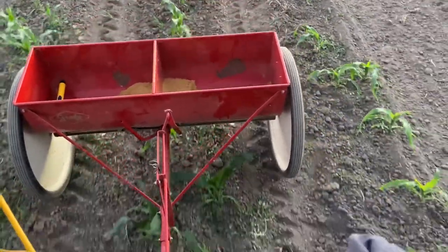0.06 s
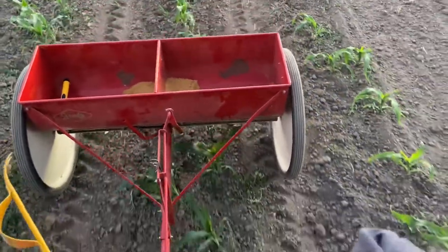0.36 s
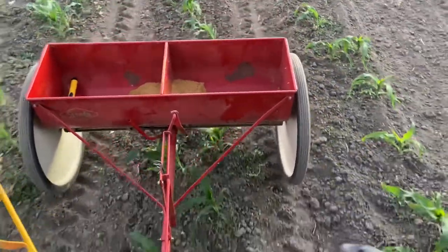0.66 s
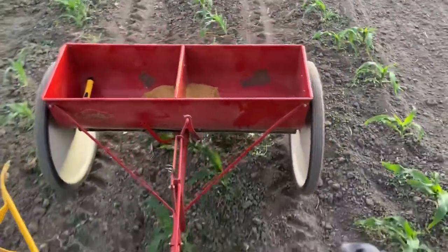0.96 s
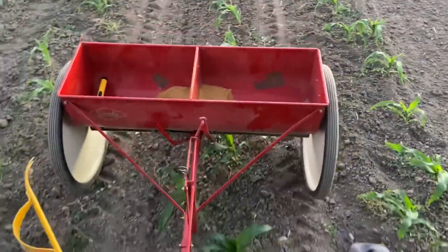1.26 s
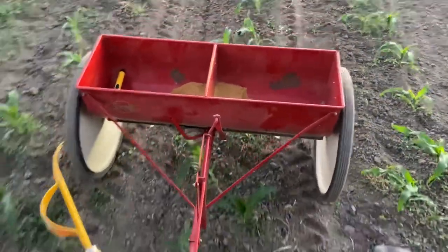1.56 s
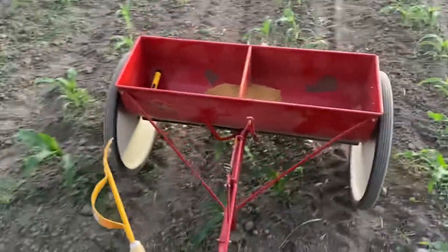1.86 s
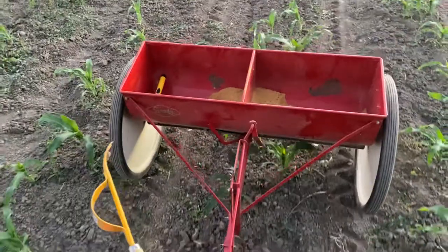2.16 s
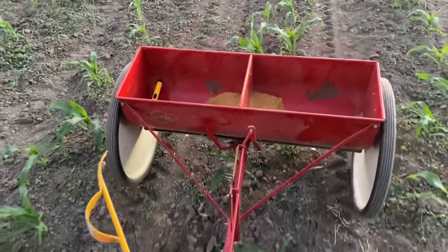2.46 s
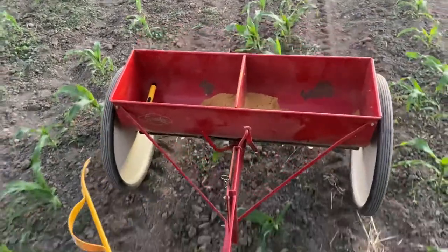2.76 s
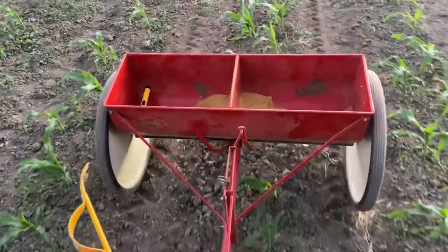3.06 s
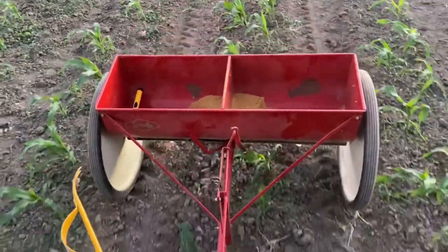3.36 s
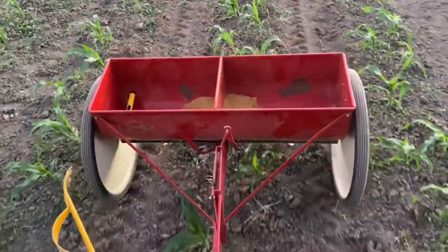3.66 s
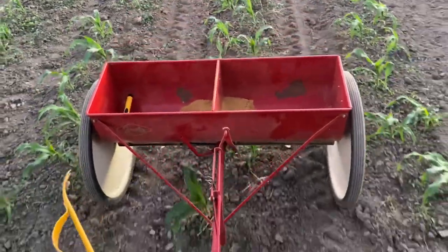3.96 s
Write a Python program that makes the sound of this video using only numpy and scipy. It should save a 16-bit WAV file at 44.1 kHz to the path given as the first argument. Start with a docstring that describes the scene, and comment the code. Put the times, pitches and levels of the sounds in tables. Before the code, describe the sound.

Close from the seat, a tractor drones evenly across a field, its deep pulsing exhaust mixed with metallic chatter and faint gear whine. It grows slightly louder as a small towed seed drill rattles and its hitch clanks now and then.

```python
"""Tractor and seed drill, from the driver's seat.

Out on a field at steady revs, two microphones close behind the engine. Each firing sends a puff down
the exhaust that sinks in pitch, booms and rings the pipe. The chassis shudders, the engine clatters in
step with the shaft, gears whine, fan and belts hiss. Behind the seat a small towed seed drill rattles
and clanks on its hitch."""
import sys
import numpy as np
from scipy import signal
from scipy.fft import rfft, irfft
from scipy.io import wavfile
from scipy.ndimage import uniform_filter1d, map_coordinates

SR = 44100
rng = np.random.default_rng(int(sys.argv[2]) if len(sys.argv) > 2 else 0)


def file_out(sig):
    """Save sig as 16-bit WAV at sys.argv[1]."""
    # one column per channel
    cols = np.atleast_2d(sig).T
    # limit, then scale
    lim = np.clip(cols, -1, 1)
    pcm = np.round(lim * 32767).astype(np.int16)
    wavfile.write(sys.argv[1], SR, pcm)


N = 176400
TIME, FREQS = np.arange(N) / SR, np.fft.rfftfreq(N, 1 / SR)


def undb(db):
    """Decibels to gain."""
    return 10 ** (np.asarray(db) / 20)


def unit(x):
    """Scale to rms 1."""
    return x / np.sqrt(np.mean(x ** 2))


def curve(table, column=1):
    """One column of a time table at every sample."""
    rows = np.array(table)
    return np.interp(TIME, rows[:, 0], rows[:, column])


def across(table, column=1):
    """One column of a frequency table at every bin."""
    rows = np.array(table)
    return np.interp(np.log(FREQS + 1), np.log(rows[:, 0]), rows[:, column])


def colour(x, table):
    """Filter by a spectrum that falls away steeply past its ends; the result has rms 1."""
    hz = FREQS + 1
    skirts = np.minimum(hz / table[0][0], 1) ** 4 * np.minimum(table[-1][0] / hz, 1) ** 4
    return unit(irfft(rfft(x) * undb(across(table)) * skirts, N))


def wander(per_s):
    """Smooth random wander with rms 1."""
    hold = int(SR / per_s)
    steps = np.repeat(rng.standard_normal(N // hold + 1), hold)
    return unit(uniform_filter1d(uniform_filter1d(steps, hold), hold)[:N])


def ride_band(x, db, hz, kind="band", order=2):
    """Raise or lower one band along a level curve."""
    band = signal.sosfiltfilt(signal.butter(order, hz, kind, fs=SR, output="sos"), x)
    return x + band * (undb(db) - 1)


# How the machinery reaches the two microphones at the seat
# (frequency [Hz], left minus right [dB], right lead [rad], likeness [0-1])
MIC_PATHS = [(307, 1.5, 0.46, 0.92), (477, -8, 1.94, 0.83), (637, -10, -1.73, 0.25),
             (732, -6.5, -0.84, 0.37), (1080, -3, -0.77, 1), (1810, -3.5, -0.12, 0.64),
             (2600, -1, 0.68, 0.07), (3460, 0.5, -1.36, 0.68), (5000, 0.5, -0.17, 0.23),
             (6100, 2.5, 1.8, 0.45), (7400, -4, -0.22, 1), (15100, 1.5, 0.57, 0.86)]

def at_microphones(main, stray):
    """Spread a sound over the pair; the stray part differs between them and the left treble lags."""
    pan_db, lead, likeness = (across(MIC_PATHS, column) for column in (1, 2, 3))
    treble_hz, treble_lag_s = 6830, .000226
    lead = lead + 2 * np.pi * treble_lag_s * np.maximum(FREQS - treble_hz, 0)
    mid = rfft(main) * np.sqrt((1 + likeness) / 2)
    side = rfft(stray) * np.sqrt((1 - likeness) / 2)
    left = (mid + side) * undb(pan_db / 2)
    right = (mid - side) * undb(-pan_db / 2) * np.exp(1j * lead)
    equal_power = np.sqrt(2 / (undb(pan_db) + undb(-pan_db)))
    return irfft(equal_power * np.array([left, right]), N)


# Ahead of the seat: a deep boom under each puff near twice the firing rate, then the pipe's higher rings
# (frequency [Hz], decay [s], delay after the puff [s], level against the puff [dB])
BOOM_AND_RINGS = [(45, 0.04, 0.0026, -26), (175.2, 0.0088, 0.00755, -6), (239, 0.032, 0.0008, -31.5),
                  (302, 0.015, 0.01433, -21), (323, 0.027, 0.00994, -32.5)]
PUFF_START_HZ, PUFF_SINK_S, PUFF_PEAK_S, PUFF_SHAPE = 193.2, 0.03515, 0.014, 2.2
PUFF_DELAY_S, OCTAVE_SHARE, OCTAVE_FADE_S = 0.0073, 0.36, 0.016
PUFF_SCATTER_DB, PUFF_JITTER_S, PUFF_DETUNE = 0.41, .00007, .003
TONE_SCATTER_DB, TONE_DETUNE = 1.5, 0.011

def exhaust(firings):
    """A puff per firing: it swells, sinks in pitch and dies over a deep boom, and the pipe rings."""
    starts = np.interp(np.arange(int(firings[-1]) + 1), firings, TIME) + PUFF_DELAY_S
    out = np.zeros(N)
    for start in starts:
        size, late, pitch, strength, tune = rng.standard_normal(5)
        span = slice(int(start * SR), int(start * SR) + SR // 10)
        age = np.maximum(TIME[span] - start - PUFF_JITTER_S * late, 0)
        start_hz = PUFF_START_HZ * (1 + PUFF_DETUNE * pitch)
        phase = 2 * np.pi * start_hz * PUFF_SINK_S * (1 - np.exp(-age / PUFF_SINK_S))
        swell = (age / PUFF_PEAK_S * np.exp(1 - age / PUFF_PEAK_S)) ** PUFF_SHAPE
        octave = OCTAVE_SHARE * np.exp(-age / OCTAVE_FADE_S) * np.cos(2 * phase)
        puff = -swell * (np.sin(phase) + octave)
        for hz, decay, delay, db in BOOM_AND_RINGS:
            tone_age = np.maximum(age - delay, 0)
            tone = np.sin(2 * np.pi * hz * (1 + TONE_DETUNE * tune) * tone_age)
            puff += undb(db + TONE_SCATTER_DB * strength) * tone * np.exp(-tone_age / decay)
        out[span] += undb(PUFF_SCATTER_DB * size) * puff
    return unit(out)


# Shudder of the chassis, under the seat (frequency [Hz], relative density [dB])
CHASSIS_SPECTRUM = [(48, -7), (60, -9), (100, -10), (200, -8), (250, 1.5), (320, -4), (480, -13)]

def chassis(firings, depth=0.29):
    """A low rumble that pulses once per firing."""
    pulse = 1 + depth * np.cos(2 * np.pi * (firings - .4))
    return colour(pulse * rng.standard_normal(N), CHASSIS_SPECTRUM)


# Exhaust and chassis between the microphones (time [s], left minus right [dB], left lag [s])
EXHAUST_IMAGE = [(0, 2, 0.0011), (.55, 0, 0.0006), (1.05, 0.5, 0.00052), (1.94, 0.5, 0.00046),
                 (2.02, 3.5, 0.00077), (4, 2.5, 0.0013)]

def place_exhaust(sound):
    """Level and arrival differ across the pair; the image narrows, then widens again."""
    pan_db, lag = curve(EXHAUST_IMAGE, 1), curve(EXHAUST_IMAGE, 2)
    return np.array([undb(side * pan_db / 2) * np.interp(TIME - side * lag / 2, TIME, sound)
                     for side in (1, -1)])


# Engine block and panels, close ahead (frequency [Hz], relative density [dB])
BLOCK_SPECTRUM = [(210, -4), (350, -2.5), (382, -10), (413, -4), (447, -4.5), (478, -5), (604, -5),
                  (679, -0.1), (919, -9), (994, -8.5), (1060, -8), (1270, -7.5), (1380, -9), (1700, -8.5),
                  (1930, -17.5), (2280, -17), (2850, -16.5), (3330, -25.5), (3600, -24.5), (4680, -33),
                  (7920, -120)]
# Tone of the clatter at the seat (time [s], low band gain [dB], high band gain [dB])
CLATTER_TONE = [(0, -1.5, -1), (.5, -1.5, -.3), (.67, -2, 1.5), (.8, -1.5, 0.5), (1.15, 0.5, 0),
                (1.45, -2, -2.5), (1.66, 2.5, 0), (1.9, 2.5, -2.5), (2.12, 2.5, -2), (2.25, 5, 1.5),
                (2.62, 2.5, -0.5), (2.8, 1.5, -0.5), (3.03, 2, 0), (3.22, -0.5, -1), (3.38, -0.5, 0),
                (3.6, -2, -1.5), (4, -1, 0)]
REPEAT_SHARE, KNOCK_DEPTH, LUMP_DB = 0.36, 0.045, 0.8

def clatter(firings):
    """Valve gear and cogs repeat every two firings, amid loose chatter, whine, ringing and chinks."""
    pattern = rng.standard_normal(4096)
    position = firings / 2 % 1 * len(pattern)
    repeating = unit(map_coordinates(pattern, [position], mode="grid-wrap"))
    knock = 1 + KNOCK_DEPTH * np.cos(2 * np.pi * 2 * (firings - .4))  # twice per firing
    knock *= undb(LUMP_DB * wander(per_s=110))
    chatter = np.sqrt(REPEAT_SHARE) * repeating + np.sqrt(1 - REPEAT_SHARE) * rng.standard_normal(N)
    main = colour(knock * chatter, BLOCK_SPECTRUM) + gear_whine(firings) + ringing_metal() + chinks()
    stray = colour(knock * rng.standard_normal(N), BLOCK_SPECTRUM)
    sound = at_microphones(main, stray)
    sound = ride_band(sound, curve(CLATTER_TONE, 1), hz=(350, 640))
    return ride_band(sound, curve(CLATTER_TONE, 2), hz=(1600, 4500))


# Gear and shaft tones, close by (order [x firing rate], level against the block [dB])
GEAR_ORDERS = [(19, -17), (31, -16), (32, -11.5), (34, -19), (35, -22), (39, -18.5), (51, -18.5),
               (57.8, -21.5), (69.3, -19), (79, -19)]

def gear_whine(firings, waver_db=3, waver_rad=0.61):
    """Tones locked to the shaft, each wavering in level and phase."""
    out = np.zeros(N)
    for order, db in GEAR_ORDERS:
        amplitude = np.sqrt(2) * undb(db + waver_db * wander(per_s=12))
        out += amplitude * np.sin(2 * np.pi * order * firings + waver_rad * wander(per_s=30))
    return out


# Ringing metal parts around the seat (frequency [Hz], level against the block [dB])
METAL_MODES = [(682, -12.5), (1090, -17), (1230, -21), (1340, -18), (1570, -22), (1700, -18), (2530, -25.5),
               (2745, -26), (2905, -24.5)]

def ringing_metal(width_hz=19, flicker_db=2.5):
    """Narrow resonances of metal parts, shaken unevenly by the vibration."""
    out = np.zeros(N)
    for hz, db in METAL_MODES:
        shake = rng.standard_normal(N) * undb(flicker_db * wander(per_s=12))
        resonance = signal.iirpeak(hz, hz / width_hz, fs=SR)
        out += undb(db) * unit(signal.lfilter(*resonance, shake))
    return out


CHINKS_PER_S, CHINK_DECAY_S, CHINK_RELATIVE_DB, CHINK_SPREAD_DB = 260, 0.019, -8, 4
CHINK_LOW_HZ, CHINK_HIGH_HZ, CHINK_KNEE_HZ, CHINK_FALL_DB_PER_OCTAVE = 1050, 4494, 1400, 8.5

def chinks():
    """Many small loose parts are jolted and ring briefly, each at its own pitch, high ones fainter."""
    age = np.arange(SR // 10) / SR
    out = np.zeros(N + len(age))
    for when, pitch, size in rng.random((int(CHINKS_PER_S * N / SR), 3)):
        hz = CHINK_LOW_HZ * (CHINK_HIGH_HZ / CHINK_LOW_HZ) ** pitch
        db = CHINK_SPREAD_DB * size - CHINK_FALL_DB_PER_OCTAVE * max(np.log2(hz / CHINK_KNEE_HZ), 0)
        at = int(when * N)
        out[at:at + len(age)] += undb(db) * np.sin(2 * np.pi * hz * age) * np.exp(-age / CHINK_DECAY_S)
    return undb(CHINK_RELATIVE_DB) * unit(out[:N])


# Fan and belts, up front (frequency [Hz], relative density [dB])
FAN_SPECTRUM = [(2200, 3), (3200, -1.5), (4000, 1.6), (5200, -1), (6000, -3.5), (7500, -3), (9000, -4),
                (11200, -3), (12500, -2), (14500, -11.5), (16000, -19.5)]
# Highest treble of the hiss at the seat (time [s], gain [dB])
FAN_TREBLE = [(0, 0.82), (.6, -0.48), (1.2, -1.2), (1.85, -1.8), (2.1, 1), (2.7, 0.67), (3.3, .5), (4, 1)]

def fan_hiss(grain_db=1, flicker_db=1.09):
    """Fine grainy hiss of the fan and belts; its top brightens halfway through."""
    grain = undb(grain_db * wander(per_s=500) + flicker_db * wander(per_s=24.75))
    main, stray = (colour(grain * rng.standard_normal(N), FAN_SPECTRUM) for _ in range(2))
    return ride_band(at_microphones(main, stray), curve(FAN_TREBLE), hz=10000, kind="high", order=4)


# Rattles of the drill, towed behind the seat (time [s], peak level before trim [dB])
DRILL_RATTLES = [(1.2184, -37), (1.58, -33), (1.645, -36), (1.8592, -40), (2.0457, -39), (2.2864, -30),
                 (2.39, -33), (2.796, -31), (2.824, -30), (2.9374, -35), (3.2724, -34), (3.3574, -33),
                 (3.461, -28), (3.675, -31), (3.8955, -30)]
# Ring of its loose metal (frequency [Hz], relative density [dB])
RATTLE_SPECTRUM = [(1500, -24), (2800, 7), (5500, -14), (8000, 5), (11500, 8), (15000, -24)]
RATTLE_TRIM_DB, RATTLE_DECAY_S, TICKS_PER_S, TICK_MAX_DB = -4.5, 0.0098, 45, -41

def drill():
    """Loose metal on the drill: a few clear rattles among many faint ticks."""
    hits = np.zeros(N)
    for start, db in DRILL_RATTLES:
        hits[int(start * SR)] += undb(db + RATTLE_TRIM_DB)
    for when, size in rng.random((int(TICKS_PER_S * N / SR), 2)):
        hits[int(when * N)] += undb(TICK_MAX_DB) * size
    envelope = signal.lfilter([1], [1, -np.exp(-1 / (RATTLE_DECAY_S * SR))], hits)
    main, stray = (envelope * colour(rng.standard_normal(N), RATTLE_SPECTRUM) for _ in range(2))
    return at_microphones(main, stray)


# Hitch and frame, just behind the seat (time [s], peak level [dB], centre [Hz])
HITCH_CLANKS = [(1.089, -27, 1190), (1.618, -24, 770), (1.655, -32, 1770), (2.282, -31, 1090),
                (2.722, -24, 1000), (2.995, -36, 3700), (3.338, -22, 1200), (3.36, -30.5, 2700),
                (3.818, -21.5, 1540)]

def hitch(decay_s=0.012):
    """Play in the hitch and frame: each jolt gives a short, heavily damped clank."""
    out = np.zeros(N)
    for start, db, hz in HITCH_CLANKS:
        resonance = signal.iirpeak(hz, Q=3.1, fs=SR)
        band = signal.lfilter(*resonance, rng.standard_normal(N))
        ring = unit(signal.lfilter(*resonance, band))
        envelope = (TIME >= start) * np.exp(-np.abs(TIME - start) / decay_s)
        out += undb(db) * ring * envelope
    return at_microphones(out, stray=np.zeros(N))


# Engine speed across the field (time [s], firing rate [Hz])
FIRING_RATE = [(0.0, 21.211), (0.5, 21.252), (1.0, 21.256), (1.5, 21.249), (2.0, 21.291), (2.5, 21.33),
               (3.0, 21.384), (3.5, 21.357), (4.0, 21.459)]
# Balance at the seat, before the trims (time [s], exhaust [dB], clatter [dB], hiss [dB])
SEAT_LEVELS = [(0, -19, -30, -43.5), (.4, -17.5, -29.5, -40.5), (1, -17, -30, -40.5),
               (1.45, -16.5, -28.5, -41.7), (1.66, -16, -29, -40), (1.93, -16, -30.5, -42),
               (2.03, -17.5, -29, -40.5), (2.33, -16.5, -28.5, -38.5), (2.55, -16.5, -30.5, -40),
               (2.78, -16.5, -26.5, -38), (3.02, -16, -26.5, -37), (3.3, -16, -27, -38.5),
               (3.5, -15.5, -26.5, -38), (3.65, -15, -26.5, -37), (4, -15.5, -26.5, -38)]
EXHAUST_TRIM_DB, CLATTER_TRIM_DB, HISS_TRIM_DB, CHASSIS_DB = 0.5, 1.51, 1.65, -33

def scene():
    """From the seat: one shaft drives exhaust, chassis and clatter; hiss, drill and hitch join them."""
    firings = np.cumsum(curve(FIRING_RATE)) / SR  # running count
    puffs = exhaust(firings) * undb(curve(SEAT_LEVELS, 1) + EXHAUST_TRIM_DB)
    rumble = chassis(firings) * undb(CHASSIS_DB)
    engine = clatter(firings) * undb(curve(SEAT_LEVELS, 2) + CLATTER_TRIM_DB)
    hiss = fan_hiss() * undb(curve(SEAT_LEVELS, 3) + HISS_TRIM_DB)
    return place_exhaust(puffs + rumble) + engine + hiss + drill() + hitch()


def record(dry):
    """The recorder cuts the deepest bass and the top from both microphones."""
    low_cut_hz, top_hz = 33, 15750
    hz = np.fft.rfftfreq(2 * N, 1 / SR) + 1
    sound = irfft(rfft(dry, 2 * N) / np.sqrt(1 + (low_cut_hz / hz) ** 16))[:, :N]
    return signal.sosfilt(signal.ellip(10, .2, 80, top_hz, fs=SR, output="sos"), sound)


dry = scene()
out = record(dry)
file_out(out)
```